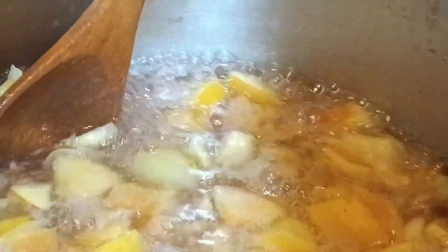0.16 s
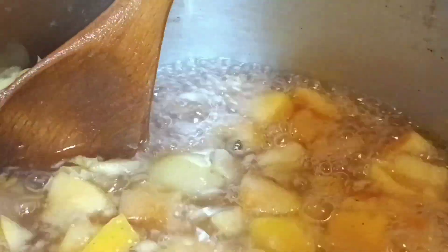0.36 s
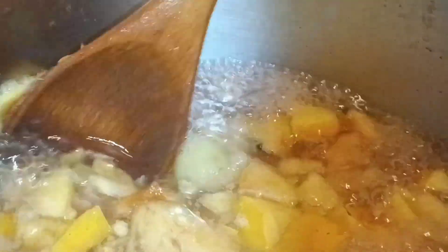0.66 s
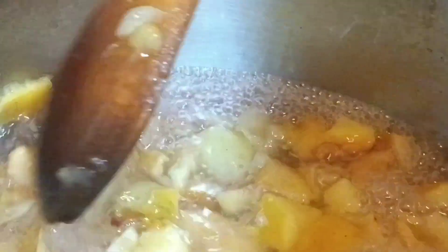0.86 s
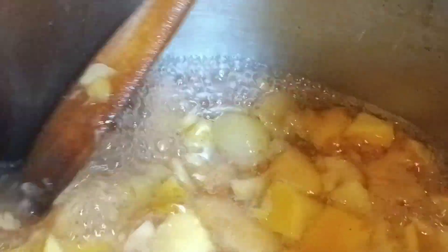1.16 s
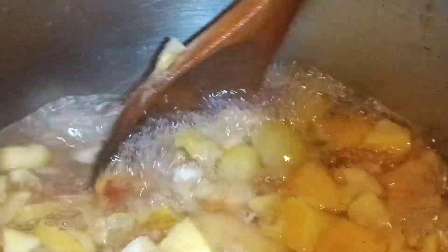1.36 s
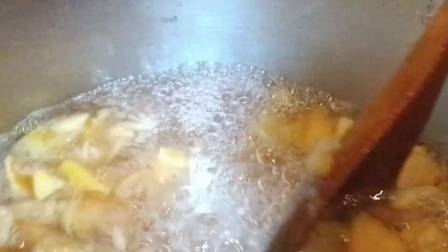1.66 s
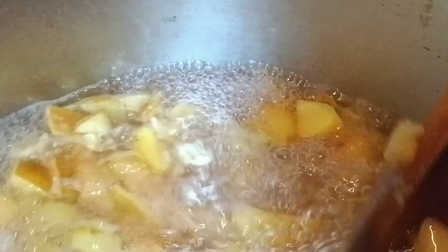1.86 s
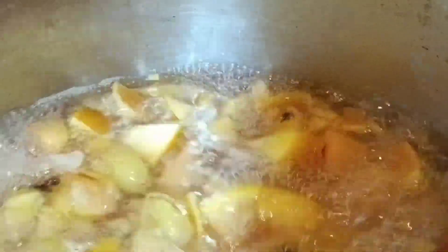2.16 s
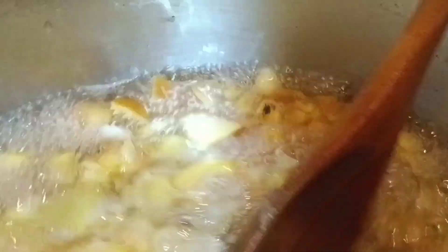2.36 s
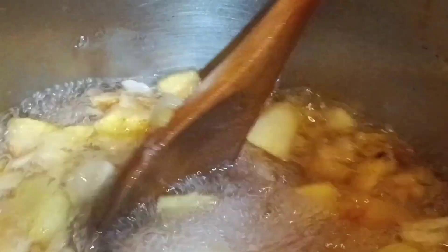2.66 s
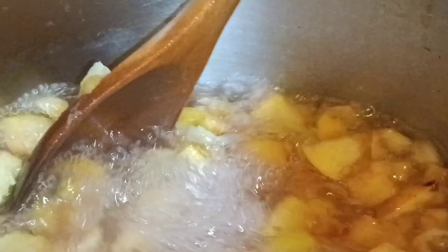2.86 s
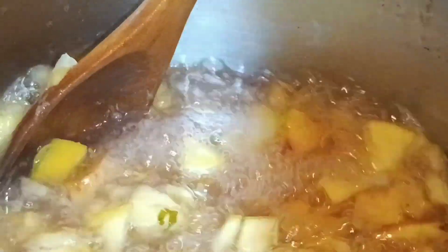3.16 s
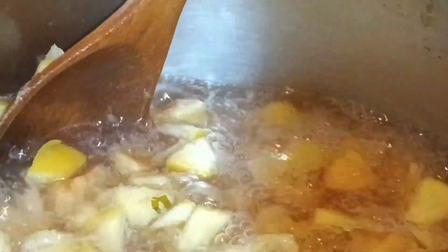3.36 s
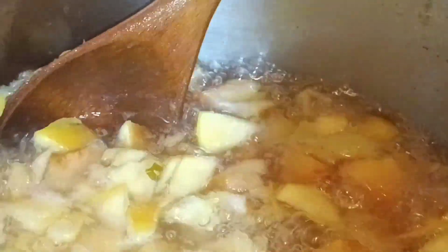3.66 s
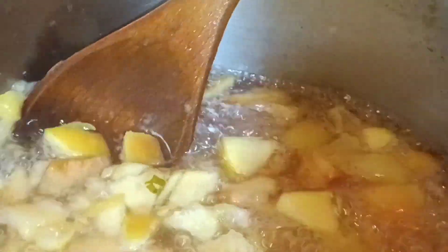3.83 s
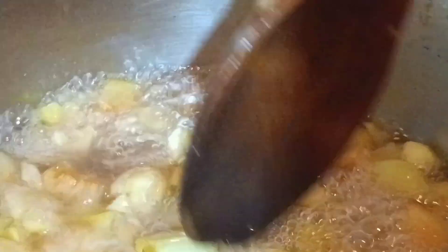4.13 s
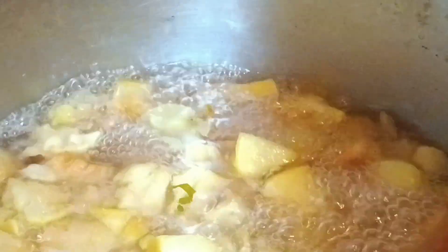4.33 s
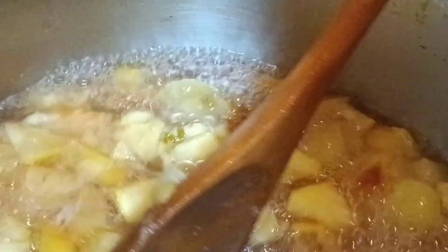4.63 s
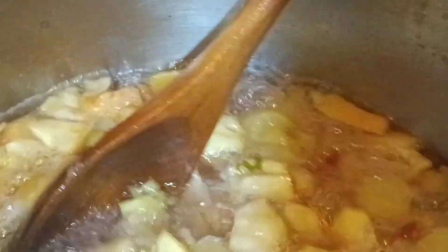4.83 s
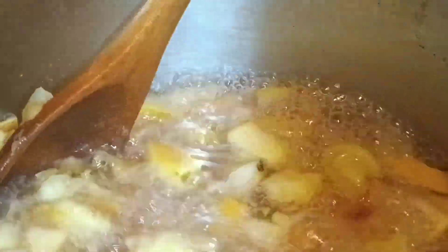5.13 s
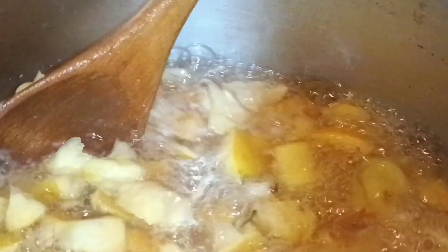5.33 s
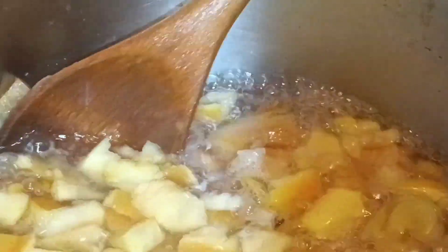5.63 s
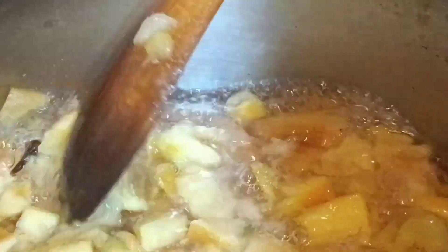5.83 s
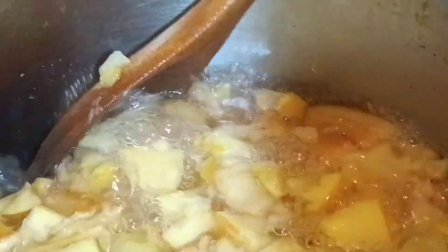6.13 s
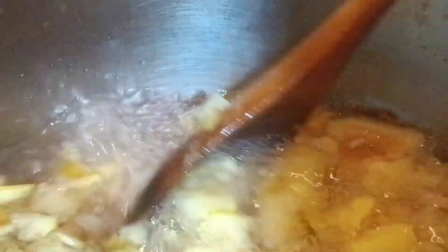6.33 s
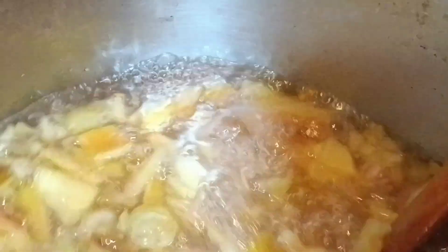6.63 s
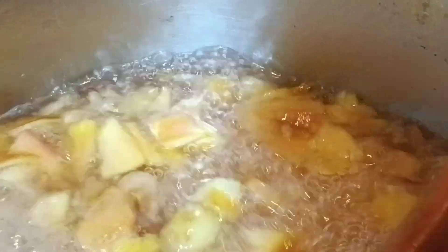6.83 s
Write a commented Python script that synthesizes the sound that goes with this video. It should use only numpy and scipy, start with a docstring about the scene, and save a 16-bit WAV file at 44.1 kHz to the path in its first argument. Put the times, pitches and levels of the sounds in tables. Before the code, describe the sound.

Close in a small kitchen, a wooden spoon stirs fruit in a steel pot over a gas flame. Quiet steady hiss and fine bubbling lie beneath. Hollow ticks, short scrapes and low booming thumps come in loose clusters, strongest around one, two and just past four seconds. Near six, a bright wet clatter with a deep knock is the loudest moment, then it calms. Phone stereo, ticks leaning left, right side dull.

```python
"""A wooden spoon stirs cooked fruit in a steel pot over a gas flame, heard by a phone with one muffled port.
The spoon thumps the pot wall so that the stove booms, ticks and scrapes the steel until its modes ring,
and gives bright wet cracks built from noise bursts. Lumps of fruit keep the stove's modes rumbling.
Under it the burner hisses in narrow bands of noise, and the syrup simmers as a broad wash with bubble pops."""
import sys
import numpy as np
from scipy import signal
from scipy.fft import rfft, irfft, next_fast_len
from scipy.io import wavfile
from scipy.ndimage import uniform_filter1d, map_coordinates

SR = 44100
rng = np.random.default_rng(int(sys.argv[2]) if len(sys.argv) > 2 else 0)


def waveform_to_disk(signal):
    """Save audio, clipped to [-1, 1], as 16-bit WAV at the path in sys.argv[1]."""
    frames = np.transpose(np.atleast_2d(signal))
    scaled = np.clip(frames, -1, 1) * 32767
    samples = np.round(scaled).astype(np.int16)
    wavfile.write(sys.argv[1], SR, samples)


N = 308259

# Fruit pushed around the pot. Each row: time in seconds, rumble level in dB, knocking level in dB.
STIR = [(0.0, -43, -67), (0.47, -69, -61), (0.89, -79, -70.5), (1.13, -54, -62), (1.28, -75, -66),
        (1.75, -65.5, -60), (2.12, -50, -66), (2.28, -60, -76), (2.74, -75, -61.5), (3.27, -57, -66.5),
        (3.68, -72, -65), (4.15, -71, -65.5), (4.4, -63, -66), (5.22, -79, -65.5), (5.94, -63, -65),
        (6.09, -36, -49), (6.35, -67, -63), (6.99, -70, -65)]
# Modes of the stove, lowest first. Each row: pitch in Hz, level in dB, free decay time (t60) in seconds.
STOVE_MODES = [(70.7, -11.5, 1), (99.2, -7, 0.41), (117.1, -6, 0.46), (153, 2, 0.35), (218.6, 0, 0.33),
               (255, -13, 0.46), (307.5, -12.5, 0.43), (406.4, -10, 0.12), (500, -24, 0.29)]
# Bands of the burner's hiss. Each row: centre in Hz, width in Hz, relative level in dB.
FLAME_BANDS = [(1328, 36, -3), (1466, 234, -1.5), (2207, 18, -9.5), (2570, 420, -20.5), (3449, 87, -8.5),
               (4232, 53, -10), (5154, 99, -7.5), (5376, 113, -7), (6980, 180, -14), (8900, 160, -27.5),
               (9970, 550, -26.5), (11300, 56, -22), (12240, 590, -24.5), (15070, 290, -16),
               (15130, 470, -16.5)]
# Colour of the simmering wash. Each row: frequency in Hz, relative level per Hz in dB.
SIMMER_COLOUR = [(40, -8.5), (75, -2), (130, -8), (300, -14.5), (420, -12.5), (1000, -17), (2000, -18),
                 (4600, -18.5), (6400, -25.5), (8200, -30), (13500, -36.5), (14600, -31), (16000, -33.5)]
# Stereo likeness of flame and simmer. Each row: frequency in Hz, left-right correlation (1 is mono).
LIKENESS = [(60, 0.77), (300, 0.77), (640, 0.24), (1400, 0.59), (2200, 0.16), (15000, 0.71)]
# Spoon against the pot wall; the first row instead leaves the stove's modes already ringing as the scene opens.
# Each row: start in seconds, level in dB, thump pitch in Hz, boom relative to the thump in dB, lift of the
# three deepest stove modes in dB.
THUMPS = [(0.001, -43.5, 166, -9, 16.5), (0.936, -50, 220, -7, 21), (1.119, -23, 210, -7, 2.5),
          (1.67, -47, 240, -7, -14), (1.968, -43.5, 188, 2.5, 5), (2.059, -37.5, 201, 7.5, -1.5),
          (2.117, -21, 186, -4.5, -2.5), (2.184, -40, 214, -8, -2), (2.495, -52.5, 170, -2, 8),
          (2.803, -46, 260, -11, -6), (2.934, -47, 300, -13, 10), (3.148, -35, 306, -12.5, 22.5),
          (3.178, -41.5, 216, 2.5, 5), (3.521, -52, 221, 3.5, -12), (3.555, -49.5, 243, -3, -11),
          (4.266, -18.5, 238, -5, -2), (4.74, -50.5, 212, -1, -1), (4.799, -57.5, 300, -7, 19),
          (5.526, -40, 262, -3.5, 1), (5.554, -40, 233, -9, 5), (5.911, -33, 240, -6, 6),
          (6.035, -17.5, 270, -7, 0.5), (6.086, -30.5, 171, 0, 1.5)]
# Strokes along the steel. Each row: start in seconds, length in seconds,
# then the relative levels of body ring, wall ring and rim ring in dB.
STROKES = [(0.336, 0.049, -41, -44.5, -48.5), (0.474, .11, -56, -56, -66), (0.93, 0.028, -42.5, -54, -72),
           (1.646, 0.022, -44, -45.5, -62), (1.889, 0.11, -55, -61, -60), (2.018, .12, -40.5, -38, -67),
           (2.158, 0.056, -47.5, -44, -78), (2.797, 0.051, -66, -43.5, -56.5),
           (2.944, 0.048, -43, -44, -54.5), (3.149, 0.053, -52, -62, -85), (3.55, 0.034, -54, -50.5, -53),
           (3.715, 0.022, -71, -51, -71), (4.261, 0.0067, -51.5, -53, -59.5), (4.406, 0.051, -58, -57, -60),
           (4.7, .03, -74, -59, -68), (4.795, 0.016, -51.5, -52, -75), (5.013, 0.028, -81, -41.5, -62),
           (5.139, .02, -76, -45, -62), (5.451, 0.025, -53, -49, -49), (5.53, 0.011, -48.5, -53, -53.5),
           (5.623, 0.012, -54, -52, -51), (5.924, 0.013, -38, -40, -38.5), (6.039, 0.066, -45, -51, -42),
           (6.125, .15, -55, -62, -72), (6.73, 0.02, -50, -60, -75), (6.8, 0.074, -60.5, -54, -81)]
# The pot's resonances: five of the body, four of the wall, four of the rim.
# Each row: pitch in Hz, width in Hz, level in dB.
STEEL_MODES = [(416.7, 28, -3), (498.3, 25, 0), (715, 51, 2.5), (805, 82, 1), (938, 130, -11.5),
               (1188, 44, 1), (1390, 103, -0.5), (1582, 39, 7), (2030, 62, -11), (2204, 43, -7.5),
               (2622, 86, -12), (2840, 83, -13), (3660, 200, -21.5)]
# Spoon edge ticking the steel. Each row: start in seconds, level in dB, main pitch in Hz.
TAPS = [(0.35, -28.5, 780), (0.366, -29, 840), (0.381, -31.5, 700), (0.479, -32.5, 1300),
        (0.499, -37, 1130), (0.551, -30.5, 820), (0.579, -35, 786), (0.936, -30.5, 780), (1.652, -27, 886),
        (1.671, -29.5, 1300), (1.887, -34, 1260), (1.956, -48.5, 2650), (2.018, -26, 756),
        (2.032, -36, 750), (2.058, -20, 855), (2.074, -30.5, 1500), (2.099, -29, 785), (2.118, -22, 1486),
        (2.187, -26, 1700), (2.792, -22.5, 857), (2.804, -21.5, 1420), (2.85, -31.5, 860),
        (2.869, -25.5, 995), (2.927, -30.5, 1230), (2.942, -32, 780), (2.98, -29, 720),
        (3.147, -30.5, 1396), (3.372, -28.5, 850), (3.568, -35, 2660), (3.734, -29, 2680),
        (3.78, -36.5, 700), (4.051, -39, 1370), (4.268, -23, 570), (4.42, -41.5, 2180),
        (4.709, -40.5, 1960), (4.802, -22.5, 652), (5.024, -37, 1470), (5.432, -32, 1290),
        (5.453, -27.5, 1300), (5.467, -27.5, 1120), (5.53, -35.5, 500), (5.615, -34, 1400),
        (5.628, -38, 2960), (5.77, -42, 1450), (5.913, -16.5, 770), (5.923, -20, 1594),
        (6.035, -26.5, 2410), (6.043, -41, 507), (6.085, -29, 2390), (6.099, -28, 1250), (6.723, -44, 830),
        (6.752, -31.5, 766)]
# Ticks lean left, most in the middle pitches and up. Each row: pitch in Hz, left over right in dB.
TAP_LEAN = [(500, -0.5), (850, 7.5), (1450, 15.5), (2300, 17.5)]
# Bright wet cracks. Each row: start in seconds, level in dB, centre in Hz,
# width in Hz of the resonance that is applied twice.
CRACKS = [(0.368, -38.5, 6840, 6000), (0.936, -39, 3020, 1500), (1.887, -25.5, 5570, 1210),
          (3.371, -50, 3500, 1500), (5.467, -40, 5660, 1800), (5.912, -17.5, 2780, 2270),
          (5.916, -28.5, 6600, 1500), (6.036, -19, 3500, 3000), (6.039, -19.5, 8300, 5000),
          (6.059, -19, 2370, 900), (6.085, -27, 3000, 3950), (6.1, -19.5, 2730, 3640)]
# Resonances of the wooden blade. Each row: pitch in Hz, width in Hz, level in dB.
BLADE_MODES = [(1680, 190, -16), (2800, 660, 2.5), (3590, 1200, -3.5), (4700, 1200, 2.5), (6080, 990, -7.5),
               (8100, 1200, -7), (10300, 450, -15), (12400, 2600, -6)]
# Decay of the room. Each row: frequency in Hz, decay time (t60) in seconds.
KITCHEN_DECAY = [(200, 0.27), (1000, 0.12), (4000, 0.24), (12000, 0.075)]
# Response of the muffled right port. Each row: frequency in Hz, gain in dB.
MUFFLED_PORT = [(60, -2), (400, 1.5), (1500, 0), (2400, -4.5), (4400, -6), (5300, -15.5), (6500, -16.5),
                (8500, -19.5), (13800, -24), (14500, 2), (15100, -3.5), (15700, -39)]

RING_SHARE = 0.83  # a thump rings this share of the stove's free decay time
BOOM_SCATTER_DB = 2.2  # spread of the mode strengths from thump to thump
RISE_DB_PER_S, FALL_DB_PER_S = 1800, 348  # how fast a stroke sets in and dies away
SLIP_SCATTER_DB = 4.5  # spread of the slip sizes
RUB_SHARE = 0.28  # steady rubbing noise beside the slips
SNAP_T60_S, FIZZ_T60_S = 0.007, 0.069
FIZZ_DB = -18.5  # the fizz of a crack, under its snap
TOP_HZ = 15810  # band limit of the phone


def amp(db):
    """Turn decibels into gain."""
    return 10 ** (np.asarray(db) / 20)


def unit(x):
    """Scale a signal to rms 1."""
    return x / np.sqrt(np.mean(x ** 2) + 1e-20)


def along(points, hz):
    """Read a curve of (Hz, value) points on a log frequency axis."""
    f, v = np.transpose(points)
    return np.interp(np.log(hz + 1), np.log(f + 1), v)


def curves(rows):
    """Draw one value per sample for each column after the time."""
    s, *cols = np.transpose(rows)
    return [np.interp(np.arange(N) / SR, s, c) for c in cols]


def wobble(rate):
    """Draw a smooth random curve with `rate` knots a second."""
    knots = rng.standard_normal(int(N * rate / SR) + 4)
    return map_coordinates(knots, [np.arange(N) * rate / SR])


def filtered(x, response):
    """Shape x with a complex response of frequency."""
    m = next_fast_len(x.shape[-1] + 8192)
    spectrum = rfft(x, m) * response(np.fft.rfftfreq(m, 1 / SR))
    return irfft(spectrum, m)[..., :x.shape[-1]]


def resonances(modes):
    """Sum causal (Hz, width, dB) resonances with alternating signs into one response."""
    def one(f, centre, width, db):
        return amp(db) * 1j * f * width / (centre ** 2 - f ** 2 + 1j * f * width)
    return lambda f: sum((-1) ** k * one(f, *mode) for k, mode in enumerate(modes))


def stir():
    """Lumps of fruit bump the pot and keep the stove's modes going unevenly."""
    rumble_db, knock_db = curves(STIR)
    # 2.43 times the width that the free decay would give
    modes = [(hz, 2.43 * np.log(1000) / (np.pi * t60), 0) for hz, _, t60 in STOVE_MODES]
    bumps = rng.standard_normal((2, N)) * amp(4.4 * wobble(15))
    rumble = unit(filtered(bumps[0], resonances(modes[:3])))
    knocking = unit(filtered(bumps[1], resonances(modes[3:7])))
    return amp(rumble_db) * rumble + amp(knock_db) * knocking


def rush(colour, patchy_db):
    """Stereo noise of rms 1, with random gain in patches of time and frequency."""
    z = signal.stft(rng.standard_normal((2, N)), nperseg=512)[2]
    field = uniform_filter1d(rng.standard_normal(z.shape[1:]), size=4, axis=0)
    field = uniform_filter1d(field, size=8, axis=1)
    pair = signal.istft(z * amp(patchy_db * unit(field)), nperseg=512)[1][:, :N]

    def mid_side(hz):
        # this angle between mid and side gives the wanted correlation
        turn = np.arccos(np.clip(along(LIKENESS, hz), -1, 1)) / 2
        return colour(hz) * [np.cos(turn), np.sin(turn)]

    mid, side = filtered(pair, mid_side)
    return unit(np.array([mid + side, mid - side]))


def burner():
    """The flame hisses in narrow bands with dark gaps between them, its level drifting slowly."""
    def bands(f):
        return np.sqrt(sum(amp(db) ** 2 / (1 + (2 * (f - c) / w) ** 4) for c, w, db in FLAME_BANDS))
    return amp(-56.5 + 0.39 * wobble(1.9)) * rush(bands, patchy_db=3.5)


def simmer():
    """The broad wash of the boiling syrup, with tiny bubbles popping on top as resonant clicks."""
    wash = amp(-60.5) * rush(lambda hz: amp(along(SIMMER_COLOUR, hz)), patchy_db=2.5)
    pops = (rng.random(N) < 90 / SR) * amp(4 * rng.standard_normal(N))  # about 90 a second
    fizz = filtered(pops, resonances([(800, 160, 17.0), (2830, 950, 4), (5300, 1600, -35)]))
    return wash + amp(-78) * unit(fizz)


def thumps():
    """A soft blow: a few cycles from the wall, then the stove's modes ring, each beating with a near twin."""
    out, t = np.zeros(N + SR), np.arange(SR // 2) / SR
    hz_mode, db_mode, t60 = np.transpose(STOVE_MODES)[:, :, None]
    deepest = np.arange(len(STOVE_MODES))[:, None] < 3
    damped = 0.1 + 0.61 / (1 + (t / 0.14) ** 8)  # the boom drops away quickly after about a tenth of a second
    swell = 1 - np.exp(-t / 0.0054)
    for s, db, hz, boom_db, deep_db in THUMPS:
        blow = 1.23 * (t / 0.0037) ** 2 * np.exp(2 - 2 * t / 0.004)
        wall = blow * np.sin(2 * np.pi * hz * t)
        scatter, start, twin = rng.standard_normal((3, len(STOVE_MODES), 1))
        pair = np.sin(2 * np.pi * hz_mode * t + 1.93 * start)
        pair += 0.64 * np.sin(2 * np.pi * hz_mode * (1 + 0.0676 * twin) * t)
        strength_db = db_mode + deep_db * deepest + BOOM_SCATTER_DB * scatter
        boom = np.sum(amp(strength_db - 60 * t / (RING_SHARE * t60)) * pair, axis=0)
        out[round(s * SR):][:len(t)] += amp(db) * (wall + amp(boom_db) * boom * swell * damped)
    return out[:N]


def scrape():
    """Wood slips on wet steel in short uneven grains; each resonance has its own, so single pitches blip."""
    start, length, *ring_db = np.transpose(STROKES)
    t = np.arange(N) / SR - start[:, None]
    rise_db = RISE_DB_PER_S * np.minimum(t, 0)
    fall_db = FALL_DB_PER_S * np.maximum(t - length[:, None], 0)
    levels = amp(ring_db) @ amp(rise_db - fall_db)

    shape = (len(STEEL_MODES), N)
    slips = (rng.random(shape) < 150 / SR) * amp(SLIP_SCATTER_DB * rng.standard_normal(shape))
    force = unit(slips) * amp(3.9 * wobble(60)) + RUB_SHARE * rng.standard_normal(shape)

    def blip(push, mode):
        pitch_hz = mode[0]

        def response(hz):
            # wet contact: little above or below the pitch
            soft = 1 / (1 + 1j * hz / (1.2 * pitch_hz)) ** 2 / (1 - .6j * pitch_hz / (hz + 1))
            return resonances([mode])(hz) * soft
        return filtered(push, response)

    blips = np.array([blip(push, mode) for push, mode in zip(force, STEEL_MODES)])
    body, wall, rim = blips[:5], blips[5:9], blips[9:]
    rings = np.array([unit(part.sum(axis=0)) for part in (body, wall, rim)])
    return amp(-4.0) * np.sum(levels * rings, axis=0) * amp([[1.5], [-1.5]])  # leans left


def taps():
    """Each tick: a few cycles at its own pitch and a jolt into the pot's resonances up to about that pitch."""
    out, jolts = np.zeros((2, N + SR)), np.zeros((2, N + SR))
    t = np.arange(SR // 16) / SR
    for s, db, hz in TAPS:
        at = slice(round(s * SR), round(s * SR) + len(t))
        sides = amp(db + np.array([[.5], [-.5]]) * along(TAP_LEAN, hz))
        life = 0.007 + 7 / hz  # t60 in seconds: high ticks die sooner
        onset = (1 - np.exp(-t / 0.0011)) ** 2
        out[:, at] += sides * amp(3.0 - 60 * t / life) * np.sin(2 * np.pi * hz * t) * onset
        # wood passes on little above its contact pitch
        soft = lambda f: 1 / (1 + 1j * f / (1.25 * hz)) ** 2
        jolt = amp(5.0 - 60 * t / 0.0059) * rng.standard_normal(len(t))
        jolts[:, at] += sides * filtered(jolt, soft)
    return (out + filtered(jolts, resonances(STEEL_MODES)))[:, :N]


def cracks():
    """A sharp snap through the blade's resonances, with a crackling fizz that differs between the ports."""
    out, t = np.zeros((2, N + SR)), np.arange(SR // 4) / SR
    for s, db, hz, width_hz in CRACKS:
        shared, own = rng.standard_normal(len(t)), rng.standard_normal((2, len(t)))
        # the fizz steps to a new gain every 64 samples
        crackle = amp(2.1 * rng.standard_normal(len(t) // 64 + 1)).repeat(repeats=64)[:len(t)]
        snap = amp(-60 * t / SNAP_T60_S) * (shared + 0.81 * own)
        fizz = amp(FIZZ_DB - 60 * t / FIZZ_T60_S) * crackle * own
        band = resonances([(hz, width_hz, 0)])
        burst = filtered(snap + fizz, lambda f: band(f) ** 2)
        out[:, round(s * SR):][:, :len(t)] += amp(db + 8.5) * burst
    return filtered(out[:, :N], lambda f: 0.56 + resonances(BLADE_MODES)(f))


def kitchen(x):
    """The room answers with decaying stereo noise; each frequency dies at its own speed."""
    hz, t, z = signal.stft(rng.standard_normal((2, SR // 2)), SR, nperseg=256)
    decay = amp(-60 * t / along(KITCHEN_DECAY, hz)[:, None])
    tail = signal.istft(z * decay, SR, nperseg=256)[1]
    delayed = np.pad(x, (200, 0))[None]  # samples
    return signal.fftconvolve(delayed, tail / np.linalg.norm(tail[0]), axes=1)[:, :N]


def scene():
    """The pot with its room, over the steady flame."""
    bed = stir() + burner() + simmer()
    blows = thumps()
    steel = scrape() + taps() + cracks()
    steel[1] = np.roll(steel[1], shift=8)  # samples: the pot wall is nearer the left port
    return bed + blows + steel + amp(-5) * kitchen(steel.mean(axis=0))


def record(dry):
    """The right port is farther away and muffled; the phone cuts deep bass and all above its band limit."""
    late = 0.00019  # seconds

    def response(hz):
        left = np.full(hz.shape, amp(1.63))
        right = amp(along(MUFFLED_PORT, hz)) * np.exp(-2j * np.pi * hz * late)
        bass_cut = 1 / (1 - 1j * 45 / (hz + 1)) ** 3
        return np.array([left, right]) * bass_cut * (hz < TOP_HZ)

    return filtered(dry, response)


dry = scene()
out = record(dry)
waveform_to_disk(out)
```